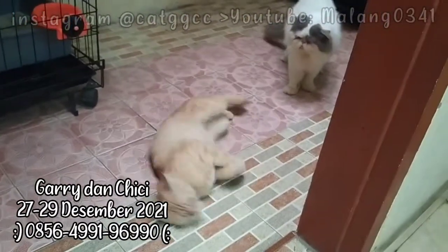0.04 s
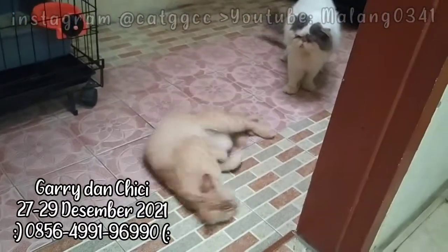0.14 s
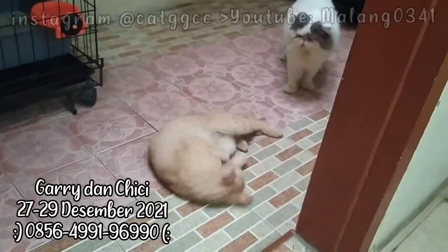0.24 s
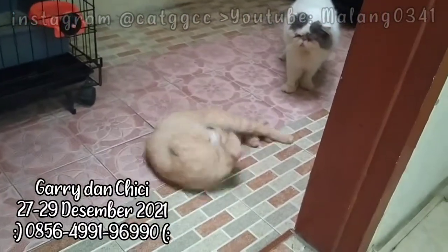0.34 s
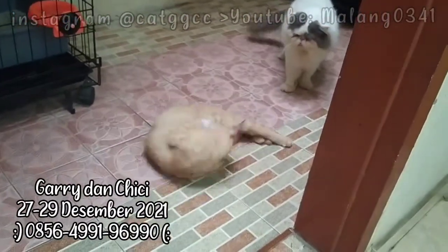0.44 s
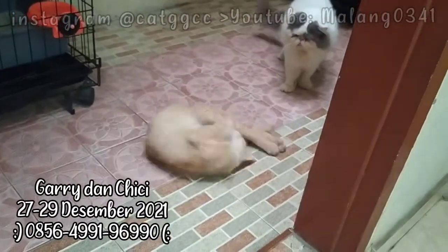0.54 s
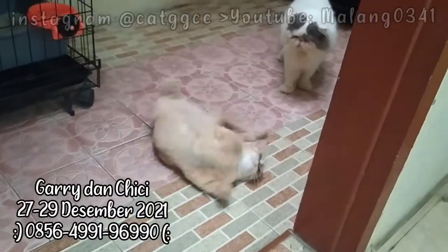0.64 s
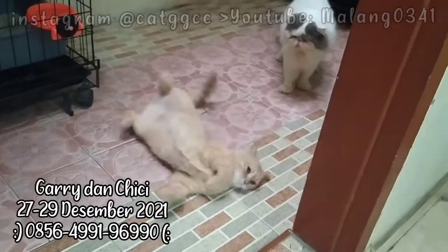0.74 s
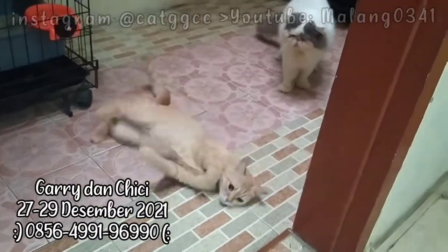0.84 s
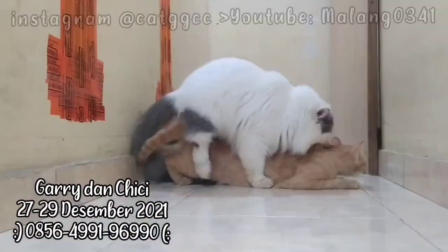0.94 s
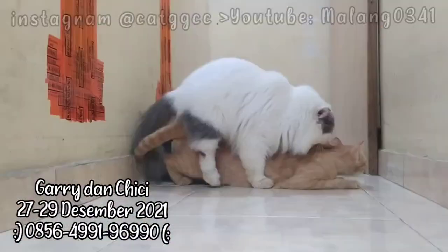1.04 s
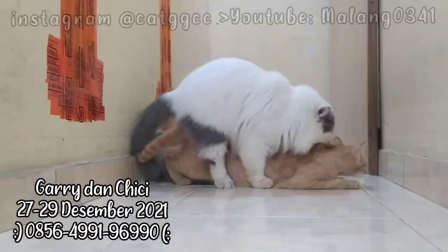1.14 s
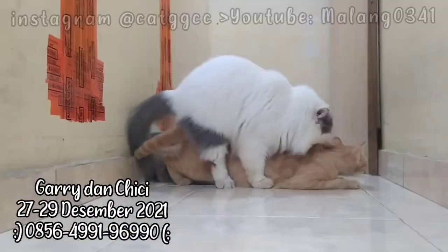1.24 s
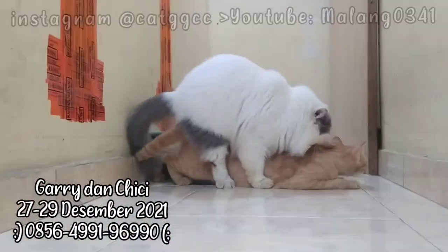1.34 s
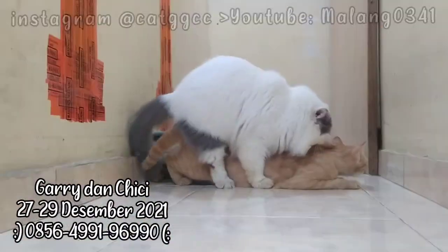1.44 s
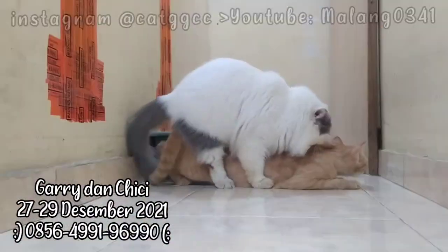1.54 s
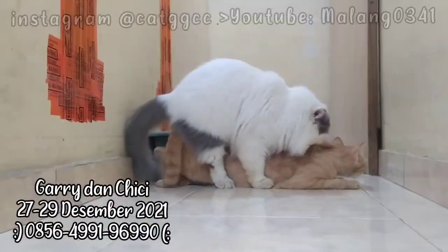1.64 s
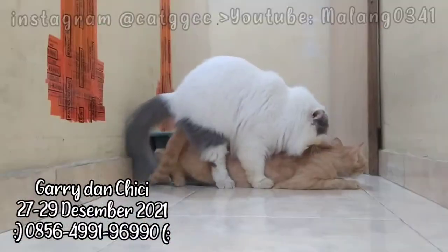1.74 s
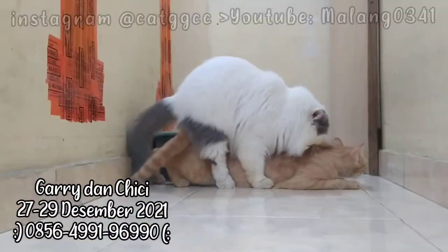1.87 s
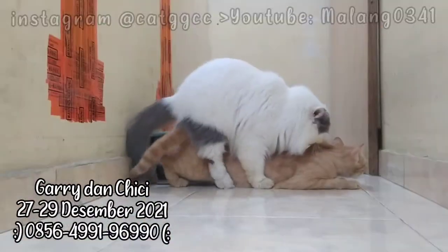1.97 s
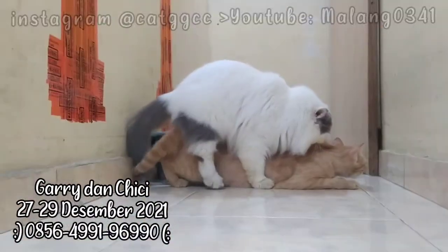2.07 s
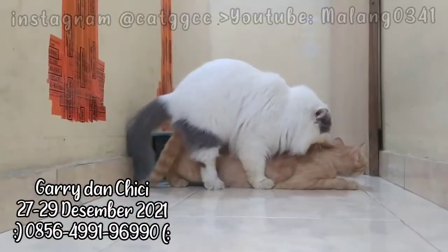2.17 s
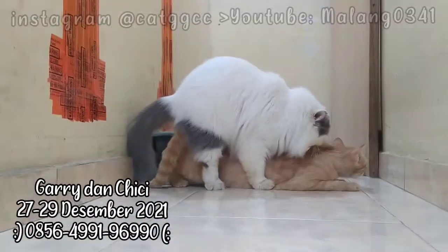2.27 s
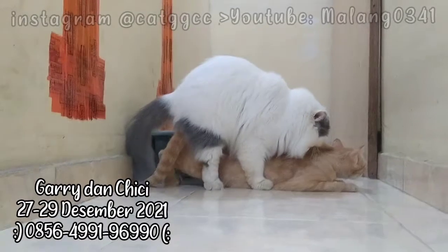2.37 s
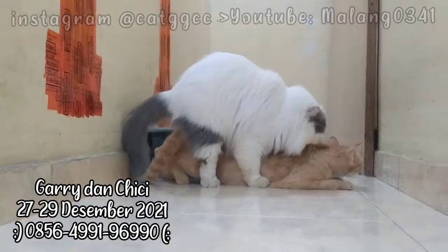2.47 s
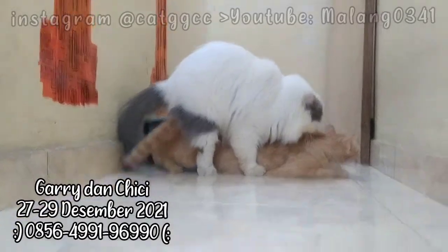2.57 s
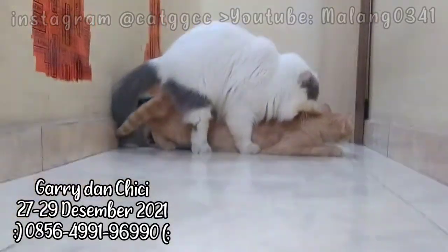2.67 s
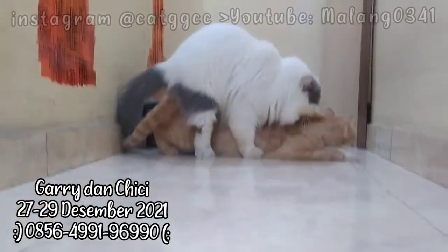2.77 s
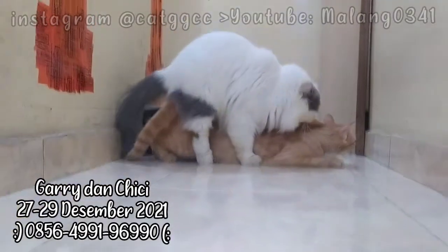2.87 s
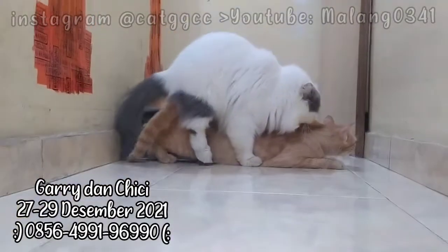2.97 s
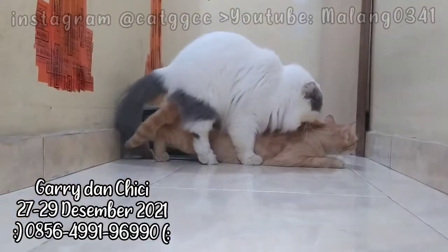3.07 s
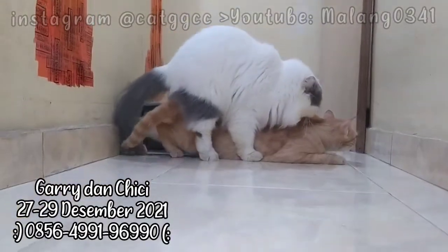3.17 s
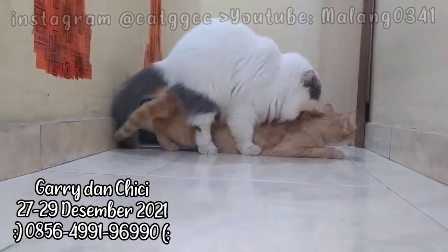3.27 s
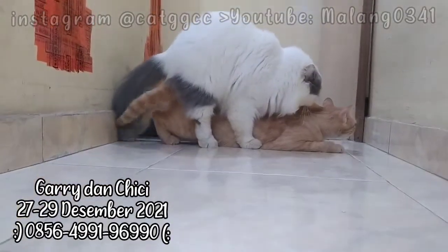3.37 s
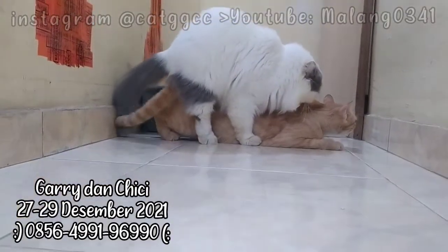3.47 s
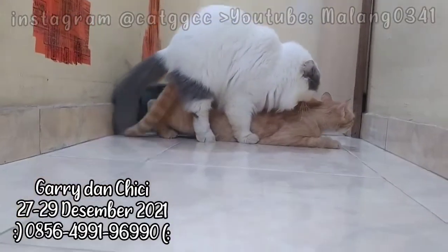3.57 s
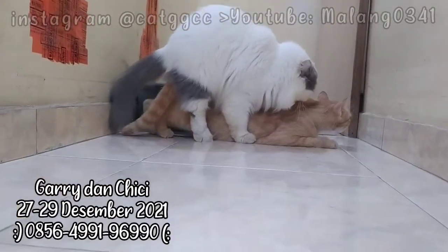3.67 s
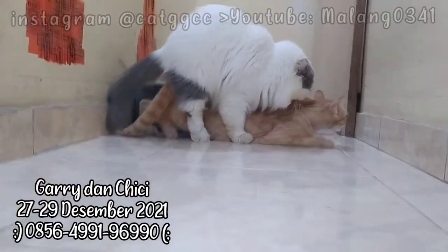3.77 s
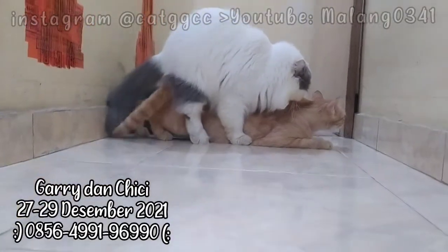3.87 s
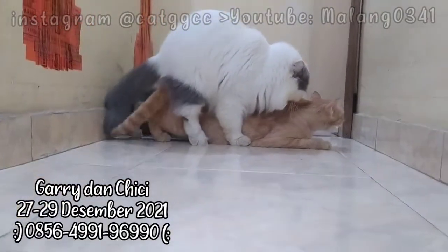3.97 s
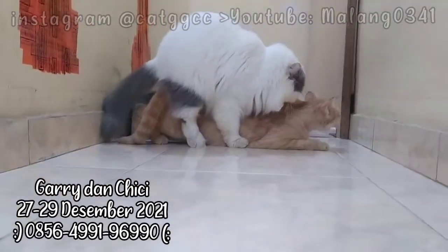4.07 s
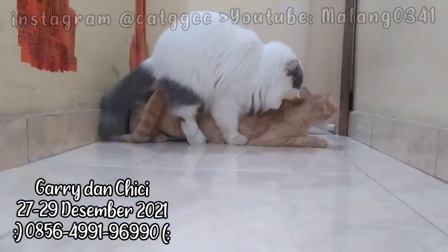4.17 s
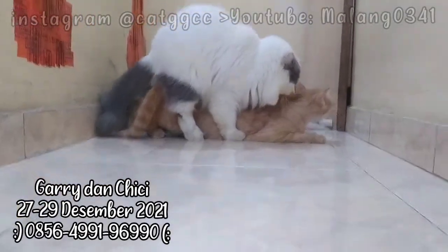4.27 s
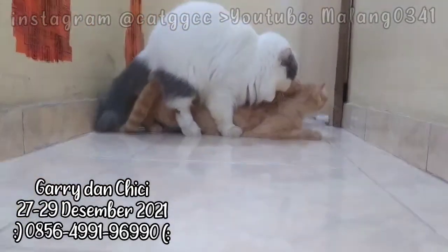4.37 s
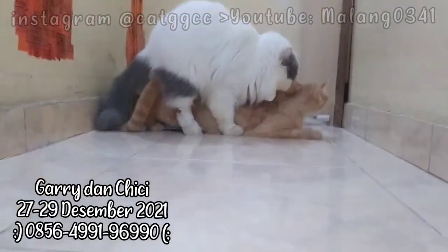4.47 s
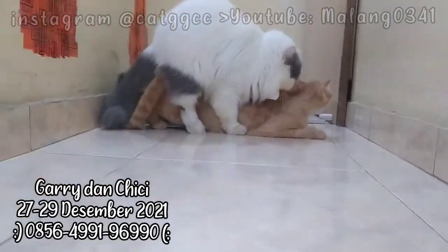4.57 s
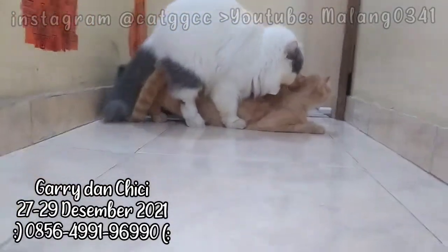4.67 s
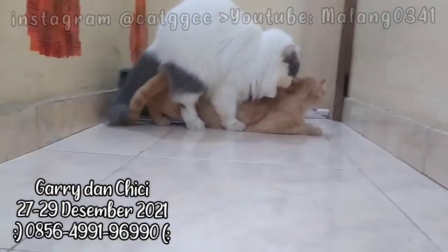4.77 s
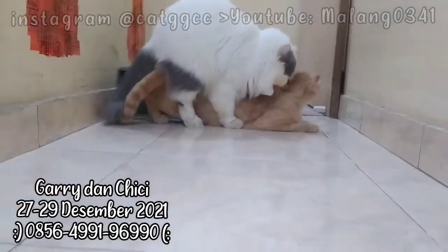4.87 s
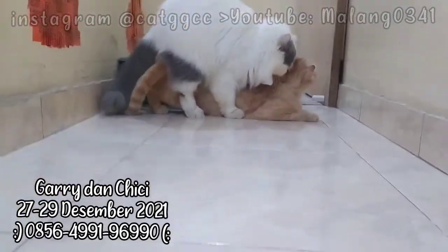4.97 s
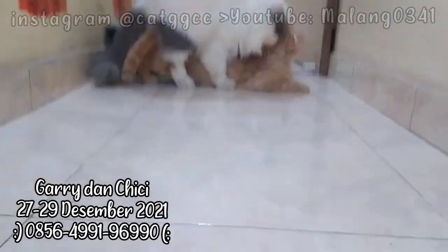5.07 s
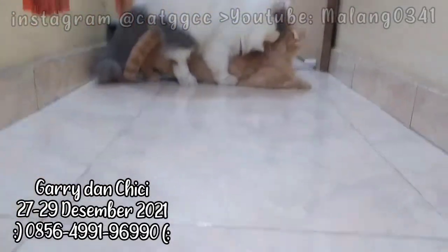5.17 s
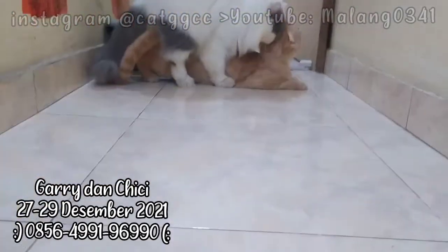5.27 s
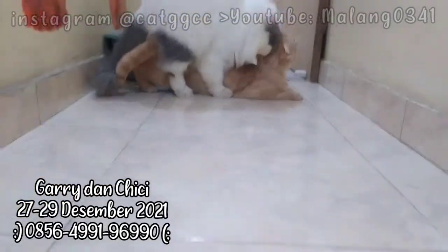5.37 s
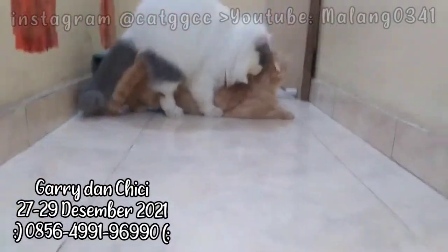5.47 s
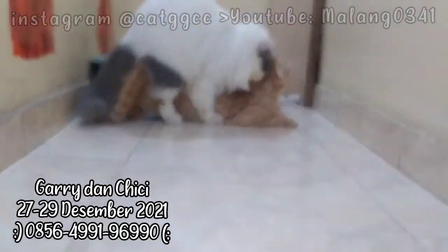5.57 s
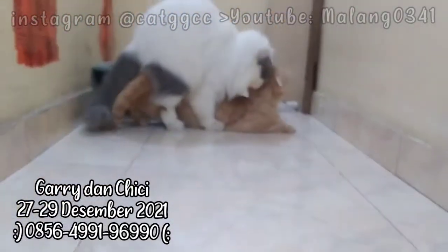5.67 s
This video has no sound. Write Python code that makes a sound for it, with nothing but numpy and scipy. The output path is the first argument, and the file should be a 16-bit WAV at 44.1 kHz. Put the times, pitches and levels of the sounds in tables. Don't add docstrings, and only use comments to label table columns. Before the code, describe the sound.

Low room rumble with light fur strokes, pad thuds and a faint cage squeak gives way, after a blink of silence, to a brief quiet growl. Sharp claw clicks tick on tile. A cat moans quietly with its mouth shut, dropping in pitch, then screams close by, raspy and double-pitched, ringing off hard walls, with slightly patchy treble.

```python
import sys
import numpy as np
from scipy import signal
from scipy.fft import rfft, irfft
from scipy.io import wavfile
from scipy.ndimage import uniform_filter1d, minimum_filter1d

SR = 44100
rng = np.random.default_rng(int(sys.argv[2]) if len(sys.argv) > 2 else 0)


def voltage_ratio(decibels):
    exponent = np.asarray(decibels, float) / 20
    return 10 ** exponent


def wav_out(sig):
    wavfile.write(sys.argv[1], SR, np.round(np.clip(np.atleast_2d(sig).T, -1, 1) * 32767).astype(np.int16))


N = 252252
T = np.arange(N) / SR
CUT_S = .868, .8975
GROWL_S, MOAN_START_S, MOAN_END_S = (.897, 1.1), 1.716, 3.7

# time in seconds, effort in dB, mouth resonance in Hz, strain [0-1].
YOWL = [
    (3.996, -33, 1169, 0.6),
    (4.034, -24.5, 1297, 0.59),
    (4.12, -27, 1472, 0),
    (4.27, -10, 1988, 0),
    (4.46, -13.5, 1982, 0.64),
    (5.03, -14, 1843, 0.56),
    (5.21, -11, 2309, 0.92),
    (5.3, -14, 2007, 0.96),
    (5.72, -13.5, 1988, 0.91),
]
# time in seconds, pitch in Hz.
FOLD_PITCH = [
    (3.996, 539.9),
    (4.18, 559.5),
    (4.32, 737),
    (4.5, 796),
    (4.64, 750.1),
    (4.74, 809.2),
    (4.88, 749.4),
    (5.26, 835.6),
    (5.44, 767.7),
]
# start in seconds, length in seconds, lift in dB.
FOLD_SPELLS = [
    (4.011, 0.17, 15.5),
    (4.163, 0.11, 13),
    (4.318, .2, 14),
    (4.556, 0.08, 13),
    (4.824, 0.142, 10),
    (4.978, 0.082, 8),
    (5.215, 0.074, 13.5),
    (5.406, .07, 5.5),
    (5.654, 0.086, 11.5),
]
# start in seconds, length in seconds, lift in dB.
SECOND_SPELLS = [
    (4.03, 0.154, 12),
    (4.53, 0.05, 7.2),
    (4.78, 0.071, 13.7),
    (4.94, 0.076, 7.5),
    (5.27, 0.16, 8.5),
    (5.52, 0.12, 5.4),
]
# start in seconds, length in seconds, lift in dB.
SUM_SPELLS = [
    (4.0, 0.199, 20.5),
    (4.24, 0.11, 2.5),
    (4.43, 0.17, 9),
    (4.72, .2, 7),
    (4.998, 0.198, 10),
    (5.191, 0.131, 22),
    (5.35, 0.24, 6),
]
# start in seconds, length in seconds, lift in dB.
LIP_SPELLS = [
    (4.0, 0.38, 11.3),
    (4.36, 0.25, 17.4),
    (4.62, 0.12, 8.9),
    (5.14, 0.11, 5.4),
]
# frequency in Hz, density in dB per Hz.
RASP = [(90, -84.5), (155, -22.0), (250, -38.5), (400, -16.5), (600, -22.5), (780, -8.5), (1050, -9.5),
        (1300, -2.0), (1600, -6.5), (2000, -2.0), (2500, 4.5), (3100, -14.5), (3800, -28.0),
        (5000, -8.0)][:-1] + [(4600, -25), (11000, -23), (12000, -80)]
# frequency in Hz, density in dB per Hz.
HISS = [(2500, -35.0)] + [(3000, 0.0), (3800, -30.0), (4800, -22.0), (6200, -19.5), (8000, -20.5),
        (9200, -14.5), (10200, -11.5), (11200, -22.0), (11700, -27.0), (12100, -77.0), (12800, -16.5),
        (13500, -36.0), (14300, -46.0), (15800, -92.0)][1:]


def yowl():
    gate, effort_db, mouth_hz, strain = columns(YOWL)
    fold_hz = columns(FOLD_PITCH)[1]
    second_hz = blend((244.24, 469.3), np.tanh(np.maximum(T - YOWL[0][0], 0) / 0.2 / 2))

    def tone_level(base_db, spells):
        lift_db = sum(lift * span(start, start + length, 0.01) for start, length, lift in spells)
        return effort_db + base_db + lift_db

    tone_db = np.array([tone_level(-29.5, FOLD_SPELLS), tone_level(-31.5, SECOND_SPELLS),
                        tone_level(-29.5, SUM_SPELLS), tone_level(-22.5, LIP_SPELLS)])
    upper_hz, upper_db = blend((2540, 2668), strain), blend((-30.5, -4), strain)
    rasp_db, hiss_db = blend((4.5, -3), strain), blend((-21.5, -13), strain)

    rough = np.interp(T, (4.13, 4.3), (1., .5))
    high = folds(fold_hz, .05 * rough, 50)
    low = folds(second_hz, .05 * rough, 50)
    flutter = voltage_ratio(4.5 * np.array([wobble(35), wobble(35), wobble(35), wobble(60)]))
    phases = [high, low, high + low, folds(mouth_hz, .024, 60)]
    tones = flutter * voltage_ratio(tone_db) * np.cos(phases)

    shaken_high = high + .9 * rough * wobble(150)
    shaken_low = low + 1.3 * rough * wobble(150)
    beat = pulses(shaken_high, count=6) * (1 + 0.88 * pulses(shaken_low, count=3))
    beat = beat * voltage_ratio(3.1 * wobble(215))
    puff_size = (0.81 + np.cos(shaken_high / 2) ** 2) * voltage_ratio(0.64 * wobble(380))
    puffs = puff_size * rng.standard_normal((2, N))
    drive = beat + .7 * puffs[0]

    narrow = np.clip((2000 - mouth_hz) / 450, .3, .95)
    mouth = np.sqrt(narrow) * resonate_twice(drive, mouth_hz, 346)
    mouth = mouth + np.sqrt(1 - narrow) * resonate_twice(drive, mouth_hz, 753)
    mouth = mouth + voltage_ratio(upper_db) * resonate_twice(drive, upper_hz, 555)
    rasp = voltage_ratio(rasp_db - 8.8 * narrow) * colour(drive, RASP, gate)
    hiss = voltage_ratio(hiss_db) * colour(puffs[1], HISS, gate)
    return gate * (np.sqrt(2) * tones.sum(0) + voltage_ratio(effort_db - 1.0) * (mouth + rasp + hiss))


# start in seconds, pitch in Hz, effort in dB, second harmonic in relative dB.
MOAN = [(1.66, 392, -47, 9), (1.784, 450.6, -48.5, -2), (1.875, 386.2, -47, 7), (2.046, 399.2, -49, 5),
        (2.139, 401.2, -41.5, 7), (2.325, 398.6, -39.5, 0), (2.495, 394.3, -40.5, 4),
        (2.575, 358.7, -46.5, 9), (2.65, 382, -45.5, 8.5), (2.73, 293.5, -51, 10), (2.84, 368.4, -42, 1),
        (2.99, 318.3, -46, 6), (3.05, 341.5, -44.5, 0), (3.09, 294.7, -40, 2), (3.13, 344.8, -48.5, 2),
        (3.24, 364.8, -45.5, -2), (3.3, 307.5, -45, 0.5), (3.46, 326.7, -49.5, -15),
        (3.56, 303.6, -61.5, -20), (3.661, 310.6, -72, -1)]
# start in seconds, end in seconds.
STEADY = [
    (1.87, 2.03),
    (2.13, 2.56),
    (2.85, 2.98),
]
# frequency in Hz, density in dB per Hz.
SHUT = [(120, -25.0), (200, -35.0), (300, -19.5), (400, -2.0), (550, -4.0), (720, -7.5), (900, -4.5),
        (1200, -17.0), (1700, -24.0), (2800, -24.0), (3500, -39.0), (4200, -22.0), (5200, -52.0),
        (6300, -14.5), (12000, -59)]


def moan():
    growl_row = (GROWL_S[0], 268.02, -50.5, -8)
    starts, *steps = np.transpose([growl_row] + MOAN)
    now = np.maximum(np.searchsorted(starts, T) - 1, 0)
    glide = int(0.025 * SR)
    hz, first_db, second_db = (uniform_filter1d(step[now], glide) for step in steps)
    growling = span(*GROWL_S, 0.0031)
    gate = growling + span(MOAN_START_S, MOAN_END_S, 0.031)

    first_db = first_db - 110 * growling * (T - GROWL_S[0])
    first_db = first_db - 8.5 * sum(np.exp(-((T - s) / 0.014) ** 2) for s in starts[2:])
    break_s = 2.72
    moan_rasp_db = np.interp(T, (break_s, MOAN_END_S), (13.5, -2))
    rasp_db = first_db + blend((moan_rasp_db, 13), growling)
    second_db = first_db + second_db
    restless = np.select([T < MOAN[0][0] - .1, T < break_s], [1., .3], .58)
    rough = blend((restless, .13), sum(span(start, end, 0.06) for start, end in STEADY))

    phase = folds(hz, .08 * rough, 40)
    upper = np.cos(2 * phase)
    upper = upper + voltage_ratio(-20.5) * np.cos(3 * phase + 0.92 * wobble(45))
    upper = upper + voltage_ratio(-31.0) * np.cos(4 * phase + 2.6 * wobble(61))
    tones = voltage_ratio(first_db) * np.cos(phase) + voltage_ratio(second_db) * upper
    tones = tones * voltage_ratio((1 + 4 * rough) * wobble(30))

    uneven = pulses(phase + 1.1 * wobble(90), count=12) * voltage_ratio(3 * wobble(70))
    uneven = uneven + .3 * rng.standard_normal(N)
    skirts = resonate_twice(uneven, hz, 170) + resonate_twice(uneven, 2 * hz, 240)
    rasp = voltage_ratio(-5.5) * skirts + voltage_ratio(-2.5) * colour(uneven, SHUT, gate)
    chest = signal.lfilter(*signal.butter(4, 1120, fs=SR), rasp)
    rasp = blend((rasp, chest), growling)
    return gate * (np.sqrt(2) * tones + rough * voltage_ratio(rasp_db + 1.0) * rasp)


# time in seconds, treble peak in dB, lower knock
# peak in dB.
TICKS = [(0.896, -53, -45), (0.898, -55, -44), (1.187, -40, -72), (1.296, -66, -43), (1.70, -40, -50),
         (2.151, -41, -62), (2.221, -42, -62.5), (2.404, -38, -55), (2.434, -31, -26.5), (3.16, -43, -75),
         (3.232, -56, -41.5), (3.307, -27, -57), (3.746, -41, -34.5)]
# time in seconds, peak in dB, frequency in Hz.
THUDS = [
    (.53, -55.5, 560),
    (.56, -45.5, 248),
    (0.779, -48, 285),
    (.8, -58, 558),
    (3.69, -45, 142),
    (3.768, -47, 193),
    (4.031, -42, 159),
    (4.07, -36, 230),
]
# time in seconds, pitch in Hz, level in dB.
SQUEAK = [
    (0.12, 1540, -67),
    (0.17, 1556, -63),
    (0.3, 1660, -76),
    (0.346, 1557, -63),
    (0.37, 1595, -80),
]


def paws():
    size = 4000
    out, t = np.zeros((2, N + size)), np.arange(size) / SR
    for s, db, low_db in TICKS:
        crack = rng.standard_normal((2, size)) * voltage_ratio(-60 * t / 0.0053)
        bright = signal.lfilter(*signal.butter(3, (6000, 11000), "band", fs=SR), crack)
        knock = signal.lfilter(*signal.butter(2, (750, 3200), "band", fs=SR), crack)
        tick = voltage_ratio(db) * bright / abs(bright).max() + voltage_ratio(low_db) * knock / abs(knock).max()
        out[:, round(s * SR):round(s * SR) + size] += tick
    for s, db, hz in THUDS:
        thud = voltage_ratio(db - 60 * t / 0.15) * np.sin(2 * np.pi * hz * t)
        out[:, round(s * SR):round(s * SR) + size] += thud
    gate, hz, db = columns(SQUEAK)
    phase = folds(hz, 0.01, 42)
    squeak = np.cos(phase) + voltage_ratio(-4) * np.cos(4 / 3 * phase)
    return out[:, :N] + gate * voltage_ratio(db) * squeak


# time in seconds, peak in dB, time to fall 10 dB in seconds
FUR = [(0, -85, 1.5), (.1, -62, 0.12), (.19, -62.5, 0.08), (.38, -61.5, .035), (.49, -63, 0.13),
       (.63, -74, -0.1), (.76, -61.5, 0.04), (.83, -64, -0.07), (.9, -54.5, -0.08), (1.185, -70, 0.07),
       (1.3, -71, .03), (1.699, -63, 0.1), (2.28, -66.5, 0.2), (2.41, -68, 0.08), (2.44, -72, 0.07),
       (2.599, -54, 0.06), (3.16, -75.5, 1), (3.312, -54.5, -0.03), (3.449, -48.5, 0.04), (3.56, -60, 0.17),
       (3.68, -64, 0.1), (3.75, -48.5, 0.11), (4.021, -49, 0.18)]
# frequency in Hz, density in dB per Hz.
FUR_TONE = [(500, -7), (1200, -12.5), (2000, -9.5), (3000, -7.5), (4500, -11.0), (6000, -8.5), (7500, -9.5),
            (9200, -3.0), (10500, -8.0), (12000, -12.0), (14000, -21.0), (15800, -48.0)]


def fur():
    strokes = 0
    for s, db, fall in FUR:
        after, before = (T - s) / fall, (s - T) / fall / 0.29
        strokes = strokes + voltage_ratio(db - 10 * np.maximum(after, before))
    shuffle_s = 1.7, 3.6
    strokes = strokes + span(*shuffle_s, .03) * voltage_ratio(np.interp(T, shuffle_s, (-69.5, -59)))
    return strokes * voltage_ratio(1.06 * wobble(150)) * wash(FUR_TONE, patchy_db=3.5)


# time in seconds, level
# in dB.
TONE_DB = [
    [(0.0, -48.5), (.2, -51.5), (0.87, -53.5)],
    [(0.9, -53), (1.3, -60.5), (3.8, -58.5), (4.25, -52), (4.7, -75.5), (5.72, -70)],
]
# frequency in Hz, density in dB per Hz.
TONES = [
    [(25, 2.5), (60, -2), (90, -9), (155, 4.5), (250, -8.5), (400, -15.5), (700, -20), (1500, -25), (2600, -27.5), (4000, -36), (6000, -34), (9000, -30.5), (11500, -38), (15800, -56)],
    [(25, 2.5), (60, -7), (90, 0.5), (155, -5), (250, -5), (400, -17), (700, -20.5), (1500, -28), (2600, -26.5), (4000, -32), (6000, -32), (9000, -28), (11500, -38), (15800, -54)],
]


def room_tone():
    tone = (T > CUT_S[1]) * voltage_ratio(-86) * np.cos(2 * np.pi * 8720 * T + 3 * np.sin(2 * np.pi * 7 * T))
    for rows, spectrum in zip(TONE_DB, TONES):
        gate, db = columns(rows)
        tone = tone + gate * voltage_ratio(db) * wash(spectrum, patchy_db=1.0)
    return tone


# frequency in Hz, left-right likeness [0-1].
SAME = [(25, .5), (60, .92), (180, .8), (500, .7), (1000, .3), (1660, .1), (9000, .05)]


def pair_ports(left, other, hz):
    same = np.clip(read(SAME, hz), 0, 1)[:, None]
    return np.array([left, same * left + np.sqrt(1 - same ** 2) * other])


def wash(spectrum, patchy_db):
    hz = np.fft.rfftfreq(1024, 1 / SR)
    a, b, c, d, patches = rng.standard_normal((N // 256 + 5, 513, 5)).T
    patches = smooth_patches(patches, 10, 12)
    z = pair_ports(a + 1j * b, c + 1j * d, hz)
    z = z * voltage_ratio(read(spectrum, hz)[:, None] + patchy_db * patches)
    return evened(signal.istft(z, nperseg=1024, noverlap=768)[1][:, :N])


# frequency in Hz, time to fall 60 dB in seconds.
WALLS = [(150, 0.65), (500, 0.33), (2000, 0.37), (6000, 0.47), (14000, 0.13)]


def walls(x):
    taps = np.zeros((2, SR))
    at = np.arange(100, SR - 20, 20) + rng.integers(0, 20, (2, (SR - 101) // 20))
    np.put_along_axis(taps, at, rng.choice([-1., 1.], at.shape), 1)
    hz, t, z = signal.stft(taps, SR, nperseg=256)
    decay = voltage_ratio(-60 * t / read(WALLS, hz)[:, None])
    tail = signal.istft(pair_ports(z[0], z[1], hz) * decay, SR, nperseg=256)[1]
    tail = tail / np.linalg.norm(tail, axis=1)[:, None]
    return signal.fftconvolve(x[None], tail, axes=1)[:, :N]


def evened(x):
    return x / np.sqrt(np.mean(x ** 2) + 1e-20)


def smooth_patches(x, across_hz, across_time):
    return evened(uniform_filter1d(uniform_filter1d(x, across_hz, axis=0), across_time, axis=1))


def read(points, hz):
    f, value = np.transpose(points)
    return np.interp(np.log(hz + 1), np.log(f + 1), value)


def columns(rows):
    s, *cols = np.transpose(rows)
    gate = uniform_filter1d(1. * ((T >= s[0]) & (T <= s[-1])), size=200)
    return [gate] + [np.interp(T, s, col) for col in cols]


def span(start, end, edge_s):
    return np.clip(np.minimum(T - start, end - T) / edge_s + .5, 0, 1)


def blend(pair, share):
    return pair[0] + (pair[1] - pair[0]) * share


def colour(x, spectrum, gate):
    y = irfft(rfft(x * gate) * voltage_ratio(read(spectrum, np.fft.rfftfreq(N, 1 / SR))), N)
    return y / np.sqrt(np.sum(y ** 2) / np.sum(gate ** 2))


def resonate(x, hz, width):
    turn = np.exp(2j * np.pi * np.cumsum(hz * np.ones(N)) / SR)
    r = np.exp(-np.pi * width / SR)
    return 2 * (turn * signal.lfilter([1 - r], [1, -r], x / turn + 1e-18)).real


def resonate_twice(x, hz, width):
    return evened(resonate(resonate(x, hz, width), hz, width))


def wobble(hz):
    return evened(signal.lfilter(*signal.butter(2, min(hz, 5000), fs=SR), rng.standard_normal(N)))


def folds(hz, jitter, jitter_hz):
    return 2 * np.pi * np.cumsum(hz * (1 + jitter * wobble(jitter_hz))) / SR


def pulses(phase, count):
    return sum(np.cos(k * phase) for k in range(1, count + 1)) / np.sqrt(count / 2)


def scene():
    cat, small = yowl() + moan(), paws()
    turned_away = signal.lfilter(*signal.butter(1, 5000, fs=SR), cat)
    direct = np.array([turned_away, np.r_[np.zeros(4), turned_away[:-4]]])
    lean = voltage_ratio(np.array([[.5], [-.5]]) * 2 * span(GROWL_S[0], MOAN_END_S, 0.18))
    voices = lean * (voltage_ratio(-5) * direct + voltage_ratio(-2) * walls(cat))
    return voices + small + voltage_ratio(-9.5) * walls(small.mean(0)) + fur() + room_tone()


# frequency in Hz, share of bands dropped [0-1].
HOLES = [(3200, 0), (4200, .18), (5000, .28), (7000, .22), (8500, .04), (10500, .05), (11300, .25),
         (13000, .3)]


def treble_dropouts(x):
    hz, t, z = signal.stft(x, SR, nperseg=1024, noverlap=768)
    patches = smooth_patches(rng.standard_normal((len(t), len(hz))).T, 6, 14)
    chance = 1 / (1 + np.exp(-1.7 * patches))
    power = (abs(z) ** 2).mean(0)
    power = uniform_filter1d(uniform_filter1d(power, size=5, axis=0), size=9, axis=1)
    floor = power.max(0) * voltage_ratio(2 * (-50 - 4 * patches))
    masked = (power < floor) & (hz[:, None] > 4000)
    kept = np.where(masked | (chance < read(HOLES, hz)[:, None]), voltage_ratio(-40), 1)
    return signal.istft(z * kept, SR, nperseg=1024, noverlap=768)[1][:, :N]


def low_pass(x):
    return signal.sosfilt(signal.butter(12, 15720, fs=SR, output="sos"), x)


def record(dry):
    room_left = np.minimum(.9 / (abs(dry).max(0) + 1e-9), 1)
    limited = dry * uniform_filter1d(minimum_filter1d(room_left, size=301), size=301)
    sounding = (T < CUT_S[0]) | (T > CUT_S[1])
    return low_pass(treble_dropouts(limited) * sounding)


dry = scene()
out = record(dry)
wav_out(out)
```